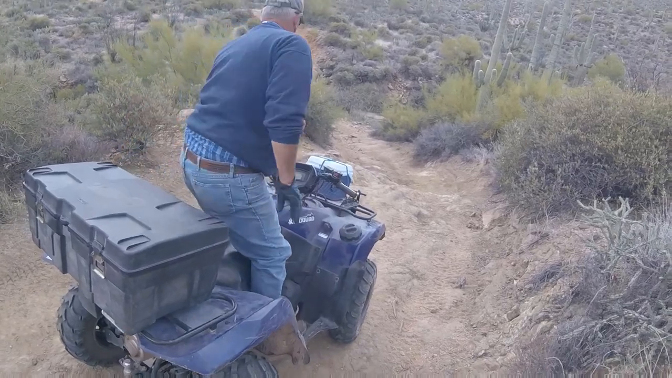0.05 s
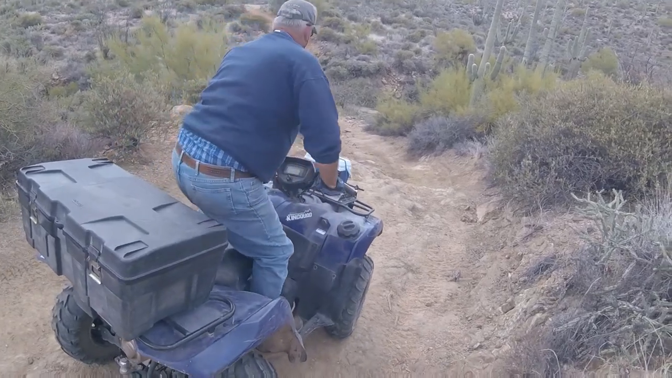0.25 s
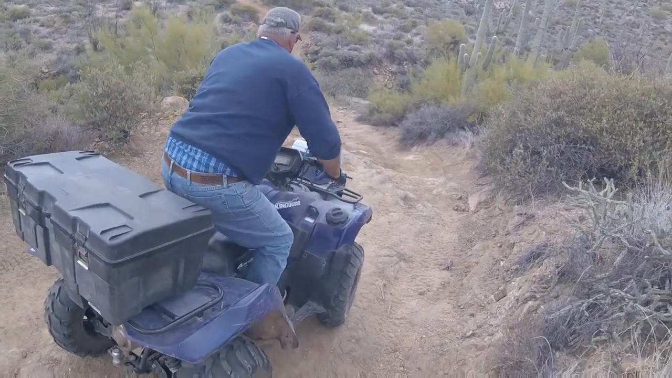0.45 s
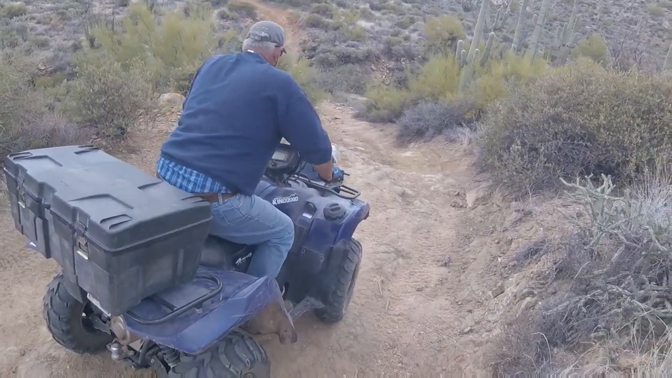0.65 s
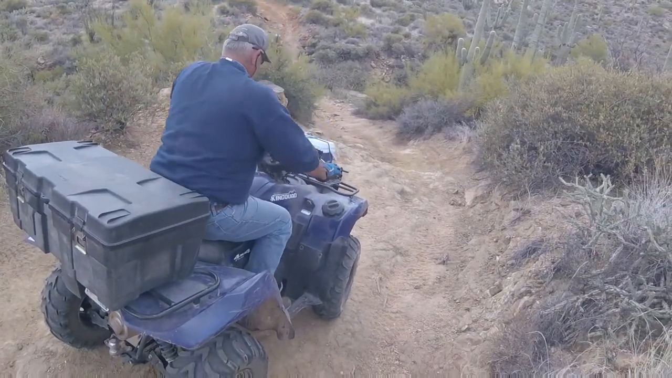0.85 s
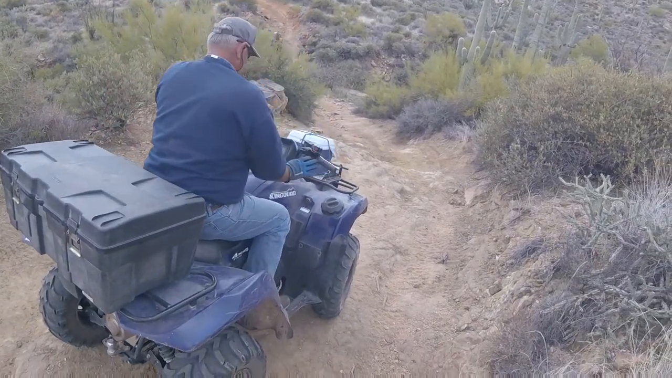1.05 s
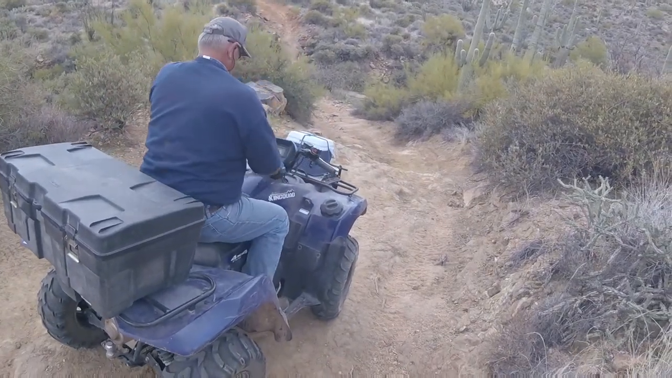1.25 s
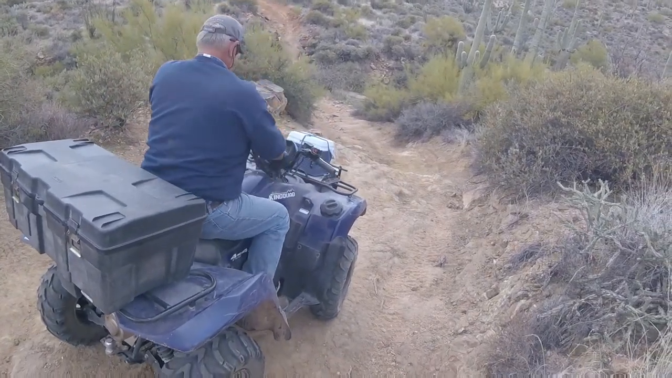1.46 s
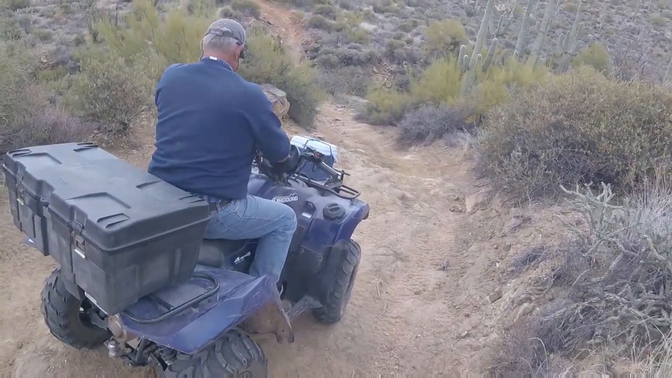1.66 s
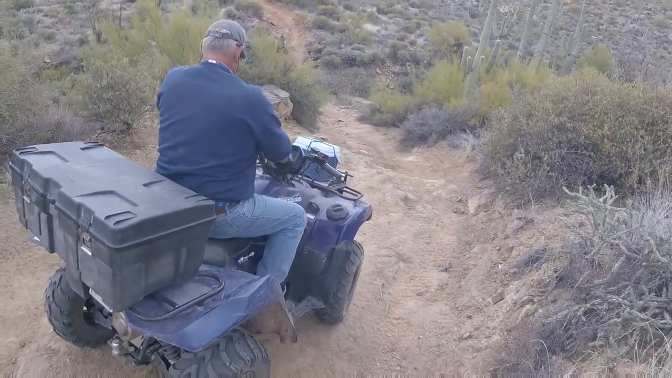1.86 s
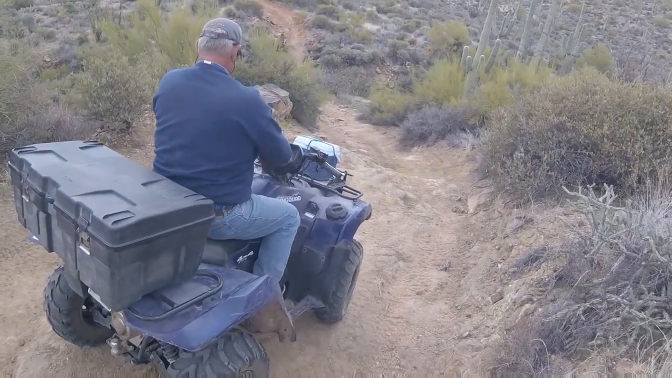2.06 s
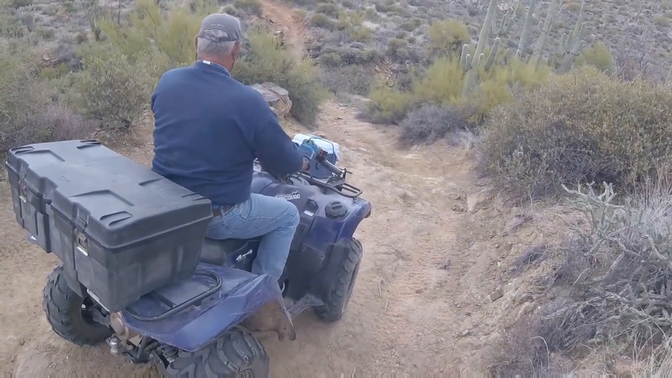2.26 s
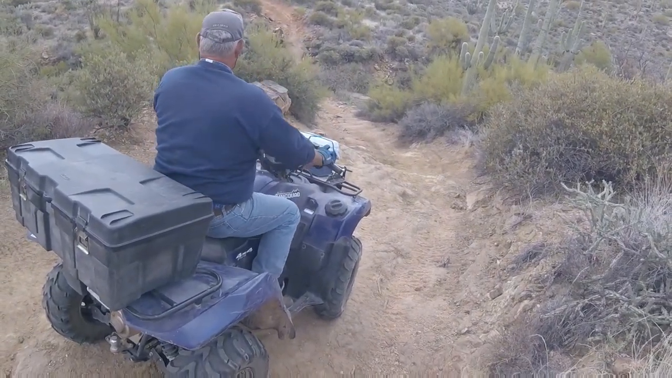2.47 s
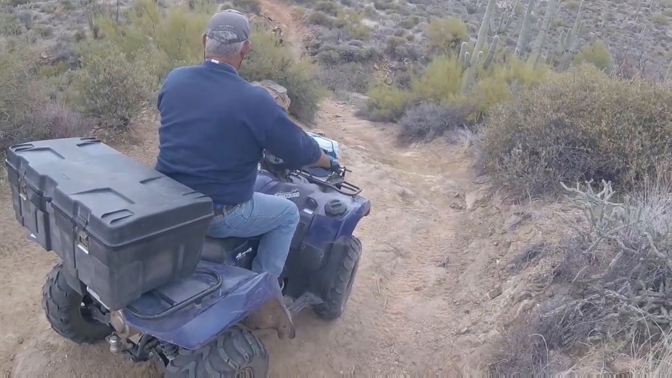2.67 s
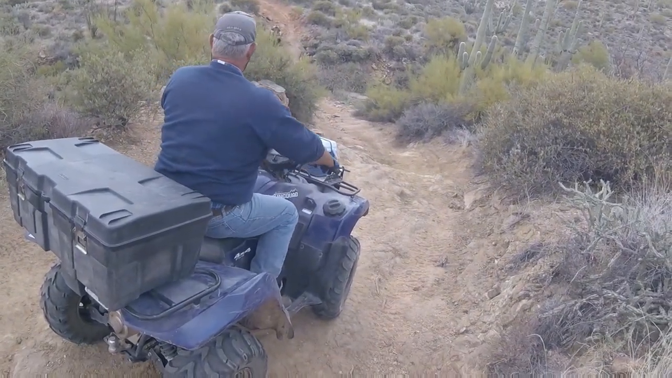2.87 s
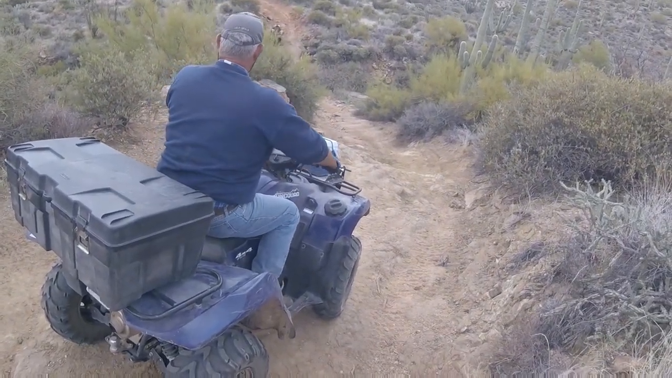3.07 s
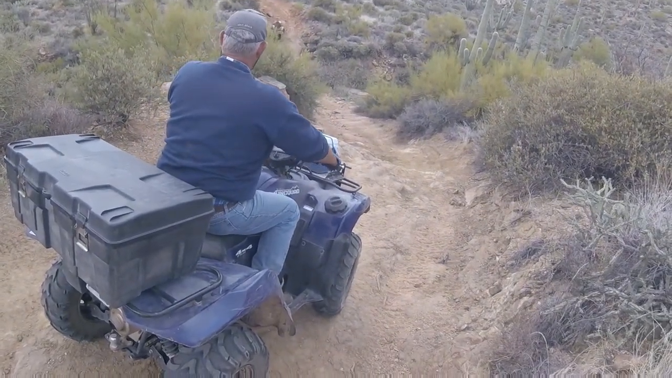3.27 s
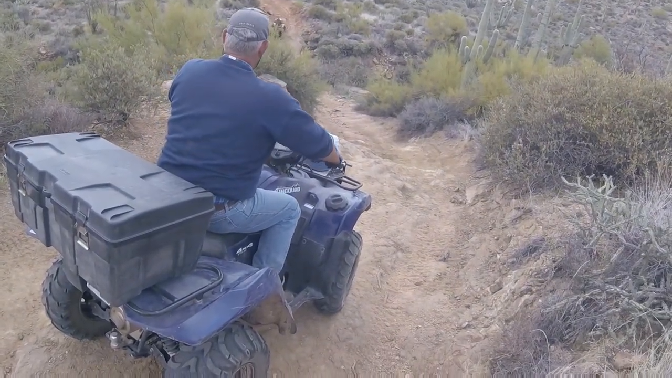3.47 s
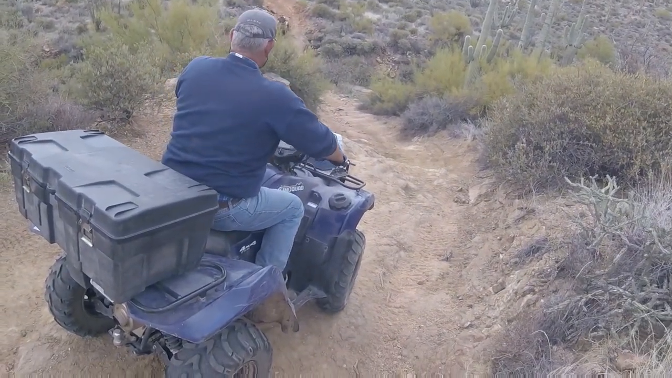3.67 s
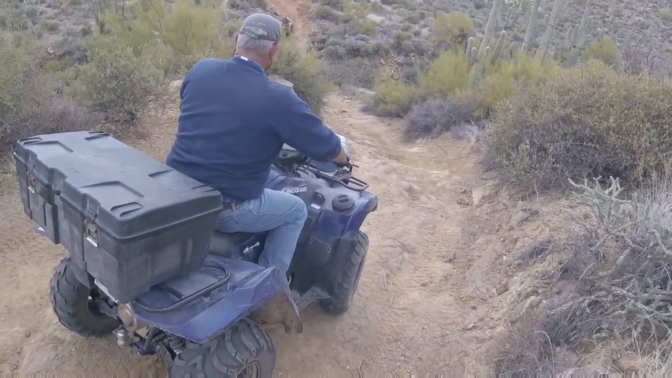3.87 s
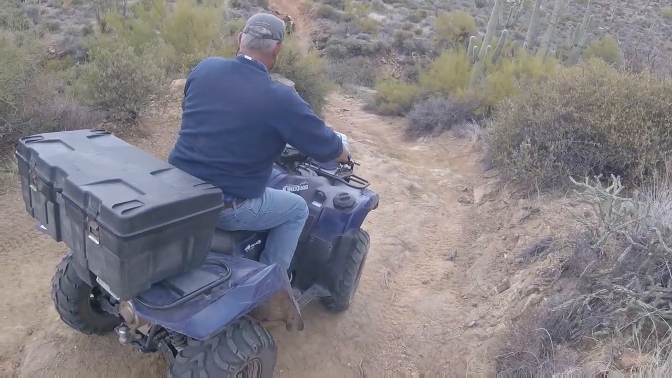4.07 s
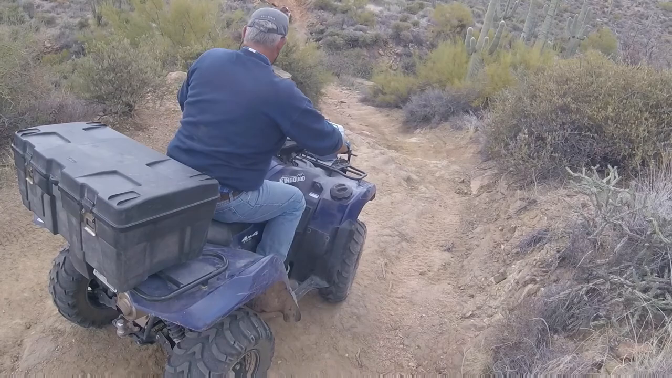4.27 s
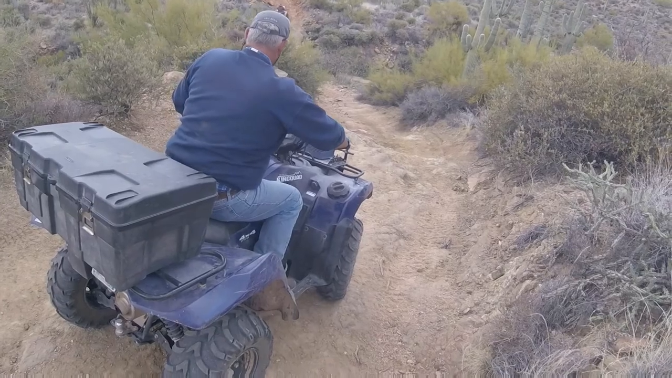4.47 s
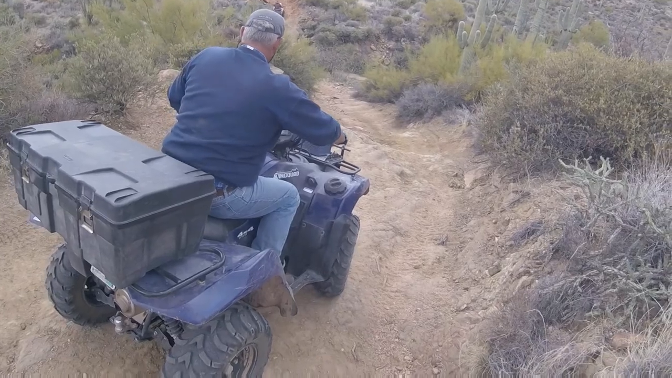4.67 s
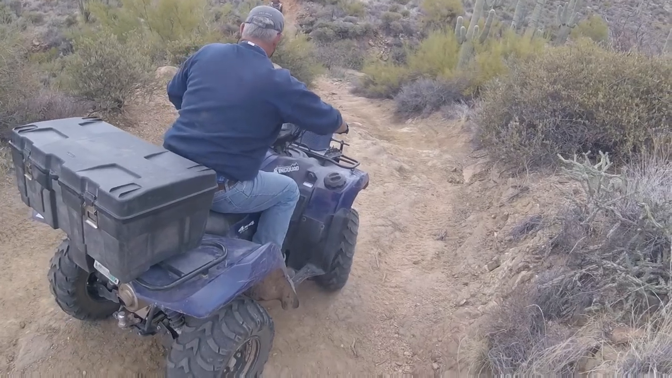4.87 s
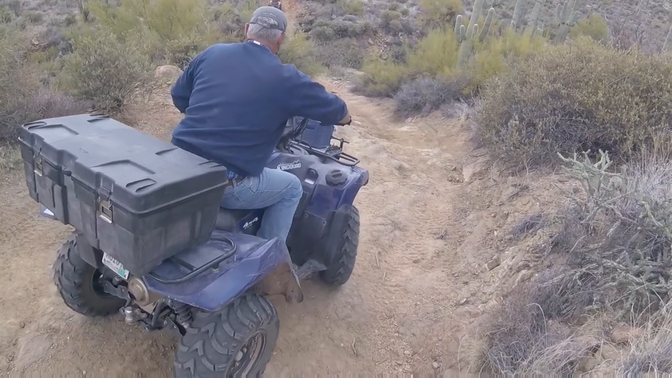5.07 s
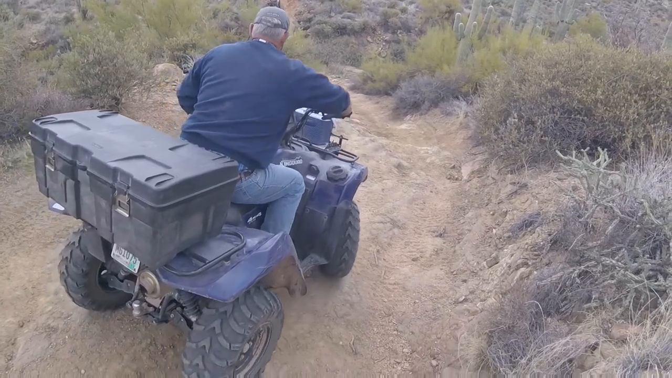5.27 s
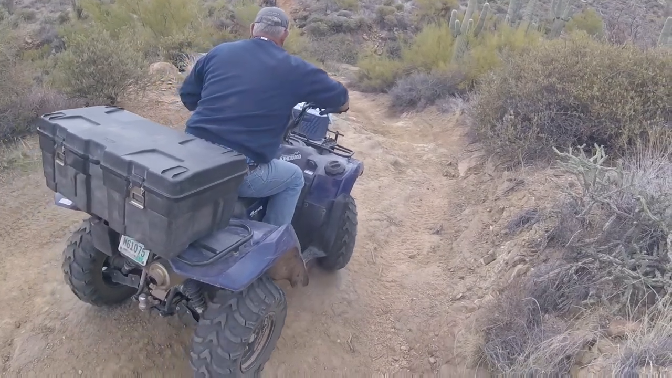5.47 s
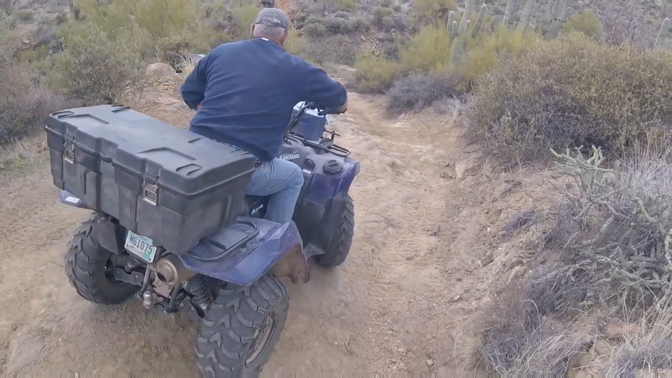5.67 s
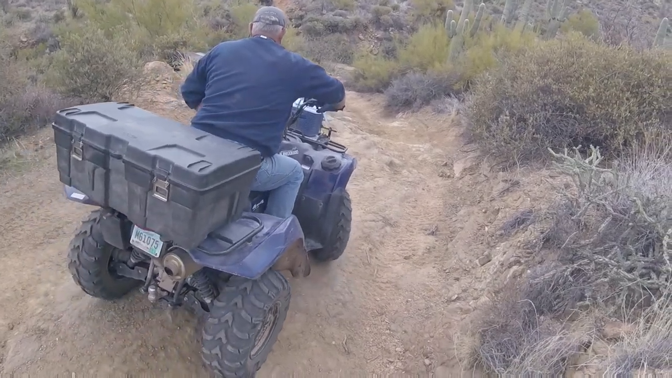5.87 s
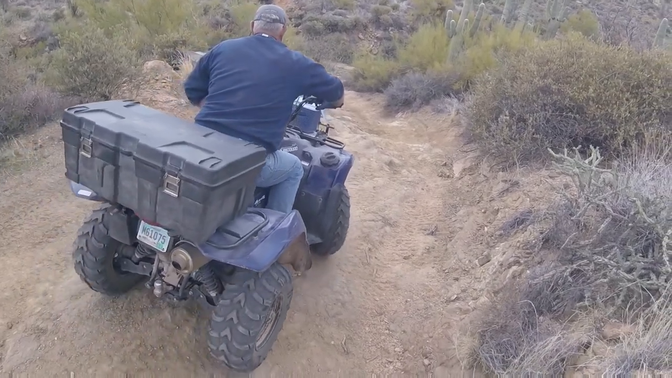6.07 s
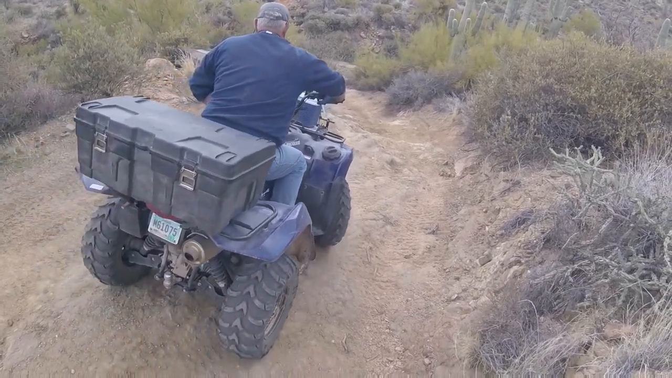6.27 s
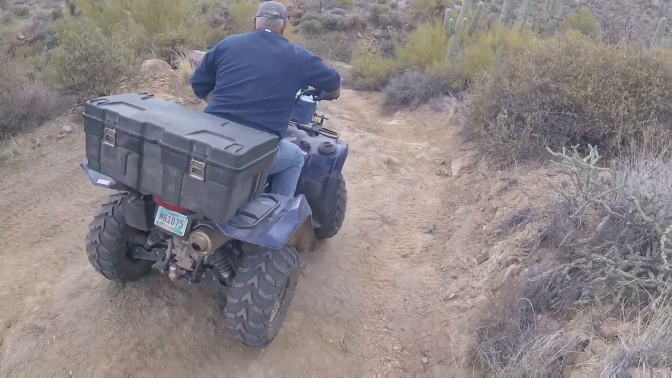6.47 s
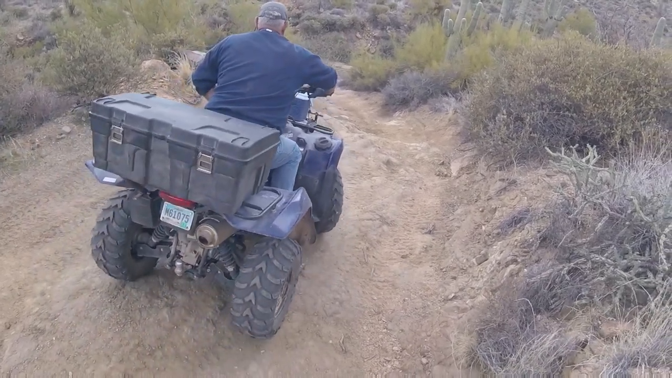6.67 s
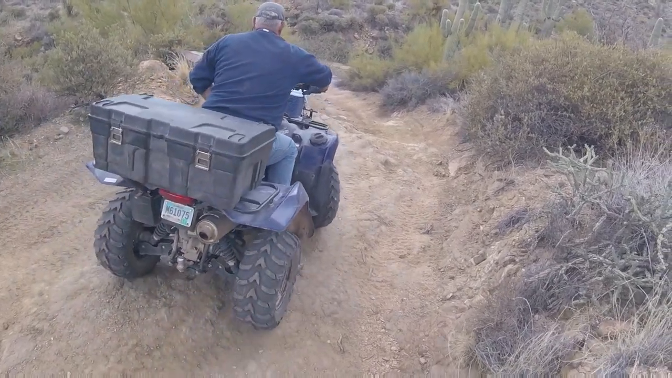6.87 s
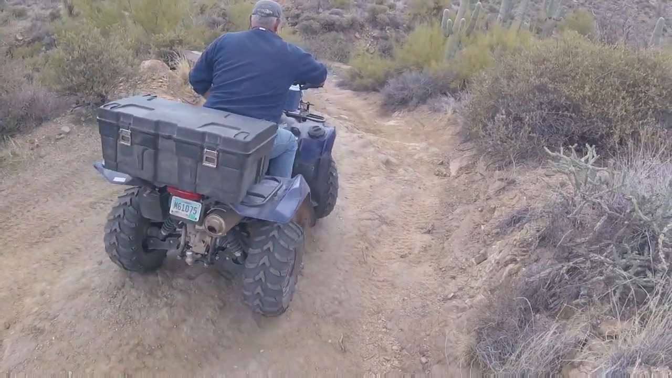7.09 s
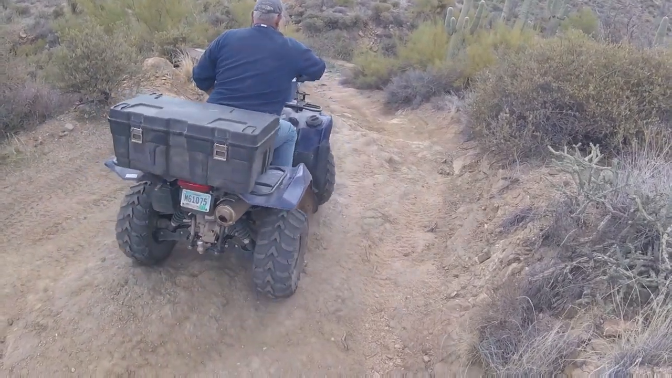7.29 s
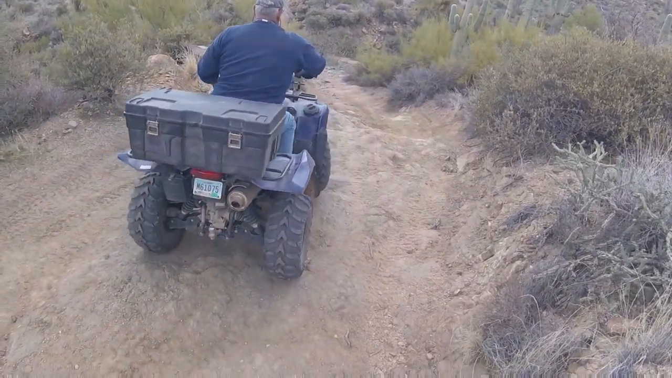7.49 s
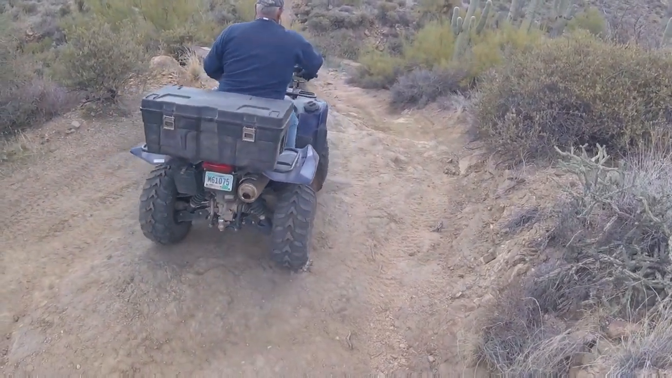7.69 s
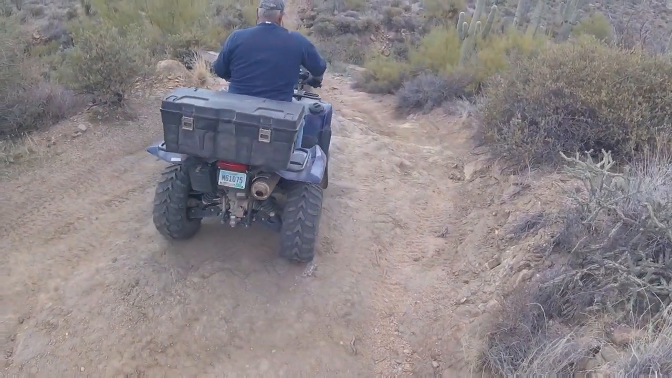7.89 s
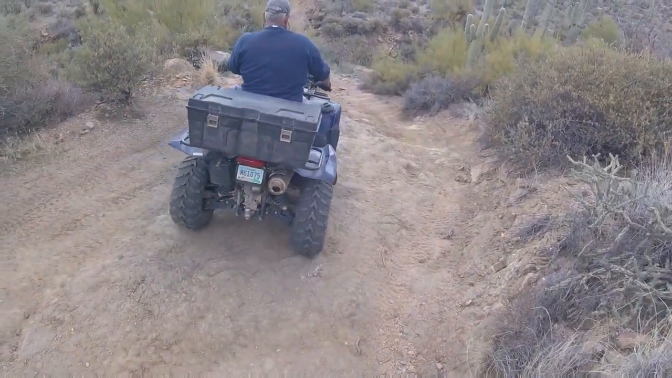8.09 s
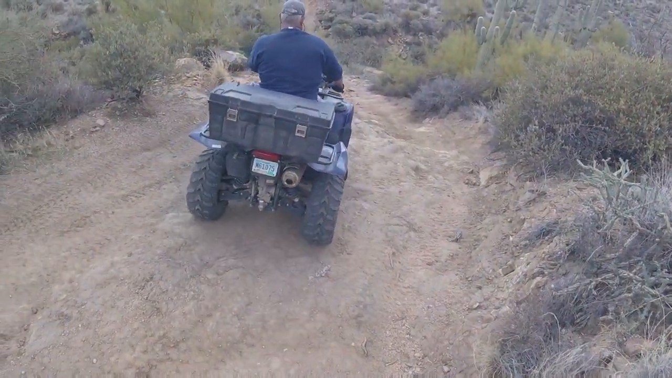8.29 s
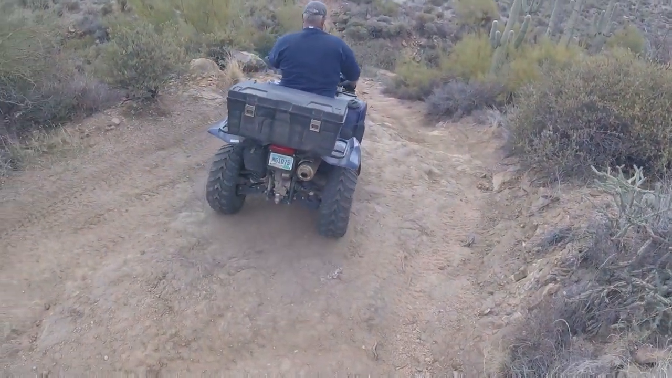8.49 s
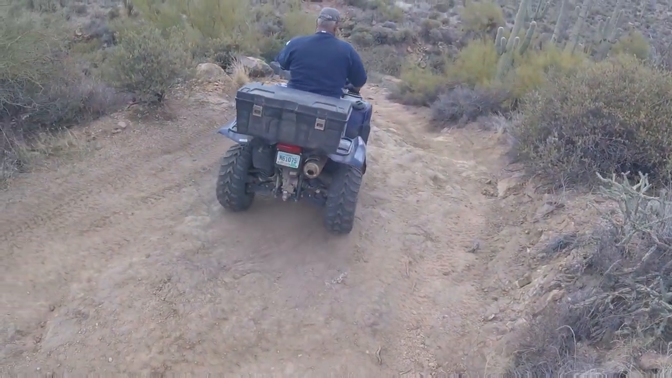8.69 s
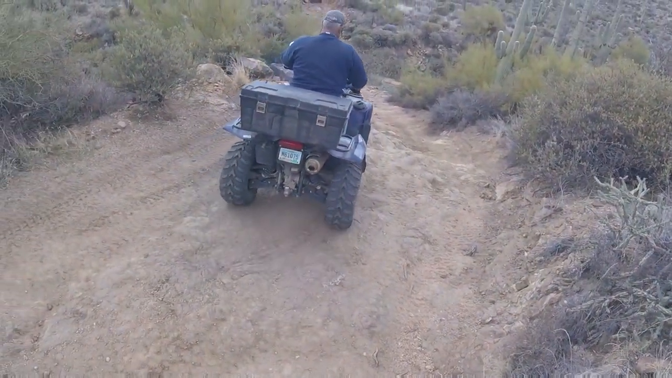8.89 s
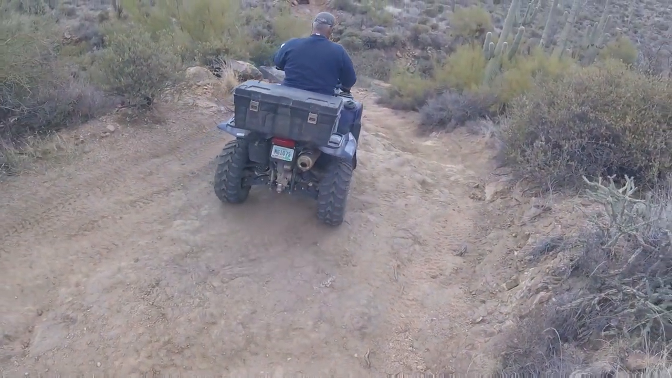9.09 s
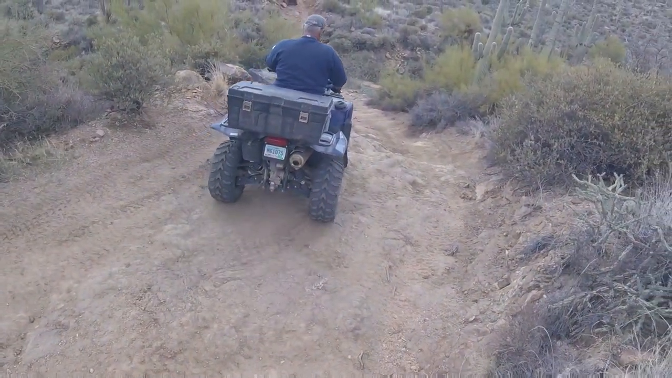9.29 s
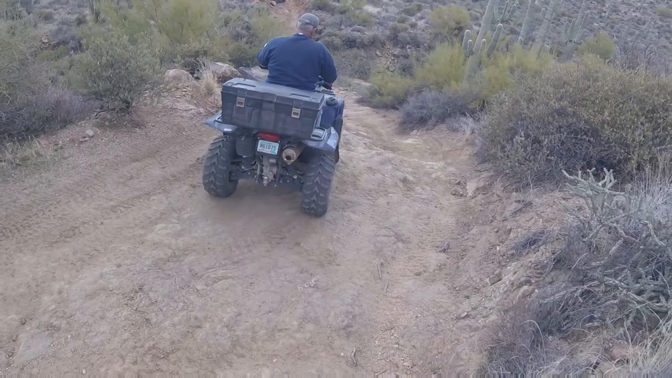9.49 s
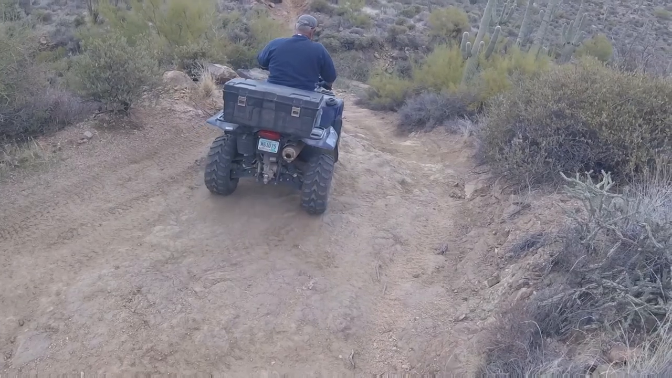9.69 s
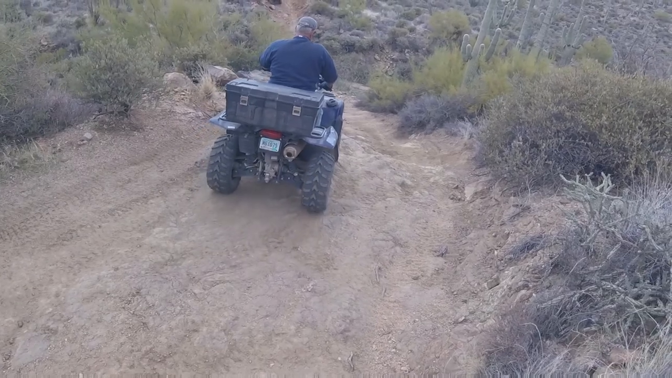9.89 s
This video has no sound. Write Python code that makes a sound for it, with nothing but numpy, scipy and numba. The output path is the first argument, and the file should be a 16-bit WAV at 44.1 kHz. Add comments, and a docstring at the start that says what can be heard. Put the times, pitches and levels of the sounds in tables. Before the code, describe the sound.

A nearby quad bike is started with a short, uneven grind after soft fuel pump ticking. The engine chugs and clatters, revs in a few surges with puffing exhaust and small chassis squeaks, then drops back to a low putter as it crawls away along the trail. Another quad idles dully in the background throughout, and gusts of wind bump the microphone in the open air.

```python
"""On a dirt trail a single-cylinder quad is started a few metres away and crawls off; another idles
further back. A fuel pump ticks and the starter gears grind. Each firing then rings the exhaust and
blows a puff of gas; valves tick, the cases clatter, timing gears sing, the chassis squeaks and clacks.
Wind buffets the microphone."""
import sys
import numpy as np
from scipy import signal
from scipy.io import wavfile
from scipy.ndimage import uniform_filter1d
from numba import njit

SR = 44100
rng = np.random.default_rng(int(sys.argv[2]) if len(sys.argv) > 2 else 0)


def store_pcm(level_fs):
    """Save levels as 16-bit WAV."""
    pcm = np.round(np.clip(level_fs, -1, 1) * 32767).astype(np.int16)
    wavfile.write(sys.argv[1], SR, np.atleast_2d(pcm).T)


N = 438354
TIME_S = np.arange(N) / SR
MESH_DB = -66  # timing gears at 2.4 m, throttle shut


def quad():
    """The near engine: one firing cycle drives all parts; throttle, heading and distance weight them."""
    # Each row: time in seconds, firings a second. Starts at the first firing.
    speed = [(3.1568, 11.595), (3.478, 10.119), (3.7667, 11.869), (4.5906, 12.554), (4.8617, 11.772),
             (5.3115, 13.803), (5.4956, 13.584), (5.9248, 16.214), (6.3031, 19.621), (6.638, 15.073),
             (6.9022, 19.217), (7.3762, 20.069), (7.4179, 14.336), (7.9007, 10.91), (9.2772, 10.965),
             (9.4465, 12.043), (9.4641, 10.333), (9.94, 11.374)]
    # Each row: time in seconds, throttle opening 0-1.
    opening = [(3.15, 0.87), (3.3, 0.24), (4.1, 0.39), (4.9, 0.38), (5.3, 0.59), (5.6, 0.82), (5.9, 0.78),
               (6.2, 0.93), (6.36, 0.89), (6.5, 0.42), (6.7, 0.79), (6.86, 0.91), (7.15, 0.78),
               (7.35, 0.65), (7.46, 0.31), (8.5, 0.31), (9.94, 0.07)]
    # Each row: time in seconds, distance in m, share heard from behind.
    path = [(3, 2.33, 0.083), (5.3, 2.25, 0.014), (6.5, 2.87, 0.03), (7.3, 2.95, 0.19), (8, 6.47, 0.36),
            (9.94, 8.4, 0.66)]
    # Per part: dB at 2.4 m with throttle shut, dB gained wide open, power of the opening,
    # dB gained from behind.
    parts = {"boom": (-36.5, 6.5, 1, 19.5), "bark": (-43, 11, 1.5, -7), "tail": (-64.5, 10.5, 2.5, 24),
             "gas": (-74.5, 26.5, 1.02, 31), "pop": (-60.5, 2.5, 5.5, -0.5), "clatter": (-53.5, 2, 2.5, 10),
             "valves": (-63, 3, 1, 3.5), "mesh": (MESH_DB, -2.8, 0.39, 2.4)}
    rate_hz, throttle = contour(speed), contour(opening)
    path_s, path_m, path_behind = np.transpose(path)
    distance_m, behind = curve(path_s, path_m), curve(path_s, path_behind)
    start_s = speed[0][0]
    cycles = np.cumsum(rate_hz * (TIME_S > start_s)) / SR + 1e-9 * TIME_S  # strictly rising
    count = np.arange(int(cycles[-1]) + 1)
    fire_s = np.maximum(np.interp(count, cycles, TIME_S), start_s)
    scatter = rng.standard_normal((len(count), 8)).T
    blow = low(clicks(fire_s - .0003, undb(scatter[0])), 131)
    flow = fade(blow, .017) * noise()  # turbulent outflow
    ticks = valve_ticks(cycles, scatter[2:6])
    exhaust = {"boom": pipe_boom(blow, rate_hz, behind),
               "bark": silencer_bark(blow, flow, rate_hz, throttle, behind),
               "tail": tailpipe(flow, fire_s, scatter[1], throttle, behind),
               "pop": chamber_pop(blow, flow, throttle),
               "gas": gas_puff(fire_s, scatter[1], throttle)}
    engine = {"valves": valve_cover(ticks),
              "clatter": via_ground(case_clatter(ticks, cycles, scatter[6:], behind), distance_m),
              "mesh": timing_gears(rate_hz, cycles)}
    gain = {name: undb(shut_db + open_db * throttle ** power + behind_db * behind) * 2.4 / distance_m
            for name, (shut_db, open_db, power, behind_db) in parts.items()}
    overrun = undb(12.5 * decay(start_s=7.428, decay_s=.25))  # the throttle snaps shut
    gain["gas"] *= overrun
    gain["boom"] *= overrun ** .2
    out = sum(gain[name] * level(x, 0) for name, x in exhaust.items())
    out /= np.sqrt(rate_hz / rate_hz.mean())  # levels per second, not per firing
    out += sum(gain[name] * level(x, 0) for name, x in engine.items())
    return out * (TIME_S > fire_s[0] - .002)


def pipe_boom(blow, rate_hz, behind):
    """A pressure thump leads the pipe tone, which hotter gas raises; shorter from behind."""
    hz = 46.95 + 2.47 * rate_hz
    out = level(band(blow, 62, 82), -10.5)
    for share, width_hz in ((1 - behind, 22.3), (behind, 41.6)):
        first = band(blow, hz, width_hz)
        out += share * level(.41 * first + band(first, hz, width_hz), 0)  # the same pipe tone once and twice over: quick onset, then a swell
    return out


def silencer_bark(blow, flow, rate_hz, throttle, behind):
    """The blow, its echo off the closed pipe end and the outflow ring the silencer."""
    # Each row: chamber pitch in Hz, width in Hz, gain in dB.
    silencer = [(179.5, 30, -16), (215.1, 56, 2), (247.5, 30, -6.5)]
    heat = 1 + .0071 * (rate_hz - rate_hz.mean())  # hotter gas raises the pitch
    chambers = [(hz * heat, width_hz, db) for hz, width_hz, db in silencer]
    echo = (.32 + .75 * (1 - throttle) + .81 * behind) * delay(blow, .01665 / heat)
    attack = level(ring(blow, chambers[1:2]), -17)
    rush = level(swell(flow, chambers), -20) * undb(13 * behind)
    return attack + level(swell(blow + echo, chambers), 0) + rush


def tailpipe(flow, fire_s, scatter, throttle, behind):
    """A hollow note, lower from behind, speaks after the blow; under load also at once."""
    outflow = level(flow, -4) + level(clicks(fire_s + .001, undb(2 * scatter)), 0)
    drive = 1.74 * throttle ** 1.8 * outflow + delay(outflow, .01057)
    return band_twice(drive, hz=637 - 102 * behind, width_hz=105)


def chamber_pop(blow, flow, throttle):
    """A small end chamber pops late, sooner under load."""
    drive = delay(blow, .01273 * (1 - throttle)) + level(flow, .5) * np.std(blow)
    return band_twice(drive, hz=378.5, width_hz=47)


def gas_puff(fire_s, scatter, throttle):
    """A noise burst leaves the outlet at each firing; under load it opens with a crack."""
    # Each row: resonance in Hz, width in Hz, gain in dB.
    outlet = [(820, 300, 10), (1430, 920, 7.5), (3120, 1700, -6), (4400, 2500, -22.5), (5180, 1220, 3.5),
              (5960, 1300, -6.5), (7700, 360, -25), (8600, 750, -29)]
    puff = fade(fade(clicks(fire_s + .004, undb(2 * scatter)), .013), .0003)
    crack = 10 * throttle ** 2 * fade(clicks(fire_s + .0029, undb(1.5 * scatter)), .0028)
    return ring((puff + crack) * noise(), outlet)


def valve_ticks(cycles, scatter):
    """Envelope of four valve impacts a cycle."""
    # Each row: share of the cycle, level in dB, decay in seconds.
    impacts = [(.03, 0, .01), (.2, 0, .01), (.7, -10, .005), (.86, -6, .006)]
    return sum(fade(cycle_clicks(cycles, share, db + 2 * spread), decay_s)
               for (share, db, decay_s), spread in zip(impacts, scatter))


def valve_cover(ticks):
    """Noise gated by the ticks rings the cover."""
    # Each row: resonance in Hz, width in Hz, gain in dB.
    modes = [(5000, 910, -10), (5850, 1400, -2), (6420, 400, -0.5), (8920, 2800, -8)]
    return swell(ticks * noise(), modes)


def case_clatter(ticks, cycles, scatter, behind):
    """Valves and piston slap rattle the cases; jolts add to it as the drive takes up."""
    # Each row of both: resonance in Hz, width in Hz, gain in dB.
    side_modes = [(505, 400, 14), (832, 30, 12), (1130, 140, 4.5), (1448, 39, 11), (1660, 230, 2),
                  (2086, 17, 8.5), (2360, 610, -2.5), (2705, 66, 1), (3270, 190, -18)]
    rear_modes = [(998, 520, 13.5), (1333, 230, 16), (1520, 340, 10.5), (1820, 160, -5), (2534, 530, 5)]
    # Each row: share of the cycle, slap level in dB.
    piston = [(.36, -1.5), (.86, -2.5)]
    # Each row: start in seconds, length in seconds, added rattle in dB.
    jolts = [(4.351, 0.02, -5), (4.442, 0.031, -15.5), (4.522, 0.056, -7), (4.588, 0.075, 1.5)]
    knocks = undb(2 * walk(40)) * noise()
    slaps = sum(cycle_clicks(cycles, share, db + 1.6 * spread)
                for (share, db), spread in zip(piston, scatter))
    slaps = level(fade(fade(slaps, .0081), .0014), 0)
    rattle = .5 + uniform_filter1d(ticks, size=600) + .2 * slaps
    side = level(ring(rattle * knocks, side_modes), 0)
    rear = level(swell((1.1 + slaps) * knocks, rear_modes), 0)
    jolt = 1 + sum(undb(db) * triangle(s, .0036, length_s) for s, length_s, db in jolts)
    return np.sqrt(1 - behind) * side * jolt + np.sqrt(behind) * rear


def via_ground(x, distance_m):
    """The sound arrives again off the dirt; the lag shrinks with distance."""
    engine_m, mic_m = .512, 1.37  # heights
    detour_m = np.hypot(distance_m, mic_m + engine_m) - np.hypot(distance_m, mic_m - engine_m)
    return x + .054 * delay(x, detour_m / 343)


def timing_gears(rate_hz, cycles):
    """The crank surges after each firing: one arched gear chirp a cycle, fading above idle."""
    # Each row: time in seconds, gain in dB.
    song = [(4.4, -9), (4.55, -3), (4.65, 2), (5, 1), (5.2, -2), (8.1, 1), (8.5, 3), (8.8, -2), (9, 1),
            (9.4, 0)]
    teeth_per_cycle, idle_hz = 170, 12.3
    surge = np.cos(2 * np.pi * (cycles - .17))
    hz = teeth_per_cycle * rate_hz * (1 + .04 * (surge - 1) + .00548 * walk(30))
    db = 1.5 * walk(6) + contour(song) - 12 * np.maximum(rate_hz - idle_hz, 0)
    chirp = np.exp(2.5 * np.cos(2 * np.pi * (cycles - .25)))
    return chirp * undb(db) * sine(hz)


def starter():
    """Uneven tooth knocks ring the gear case, hardest on each compression; slipping teeth rasp."""
    # Each row: resonance in Hz, width in Hz, gain in dB. Six for the case, then the teeth.
    modes = [(780, 220, 14), (1080, 190, 7), (1459, 21, 19), (1730, 310, 9), (2450, 1350, 6.5),
             (3370, 26, 11), (4060, 210, 2), (4800, 670, -1.5), (5600, 200, 3.5), (5910, 85, 5),
             (6200, 190, -8)]
    # Each row: start, rise and length in seconds, level in dB, relative treble in dB.
    grinds = [(2.603, .001, 0.0091, -54.5, 6), (2.608, 0.055, 0.1, -45, -2),
              (2.691, .005, 0.091, -51.5, -0.5), (2.759, .004, 0.027, -51, -3),
              (2.762, 0.039, 0.084, -41.5, 0.5), (2.826, 0.012, 0.096, -52, -6),
              (2.99, 0.0024, 0.031, -41.5, -1.5), (3.013, 0.0056, 0.032, -45.5, 0),
              (3.093, 0.0067, 0.065, -41.5, 2)]
    # Each row: start and length in seconds, first and last pitch in Hz, level in dB.
    rasps = [(2.635, .075, 3450, 3400, -54), (2.64, .05, 2600, 2550, -54), (2.755, .055, 5400, 5700, -45),
             (2.78, .04, 6700, 6000, -47), (2.8, .035, 4600, 3800, -45), (2.81, .045, 1850, 1900, -45),
             (2.81, .045, 2750, 2800, -48), (3.092, .05, 6400, 5700, -41), (2.988, .025, 5900, 5800, -44),
             (3.092, .05, 1450, 1430, -43), (3.108, .035, 2650, 2400, -43)]
    knocks = noise() * undb(2.9 * np.minimum(rng.exponential(size=N), 5)) * undb(3.4 * walk(150))
    case = level(ring(band(knocks, 1350, 4200), modes[:6]), 0)
    teeth = level(ring(knocks, modes[6:]), 0)
    out = undb(-58.5) * (TIME_S > 2.6) * (TIME_S < 3.7) * case  # whirr between compressions
    for s, rise_s, length_s, db, treble_db in grinds:
        shape = curve([s, s + rise_s, s + .7 * length_s + .3 * rise_s, s + length_s], [0, 1, .55, 0])
        out += undb(db) * shape * (case + undb(treble_db) * teeth)
    out += glides(knocks, rasps, width_hz=200, rise_share=.44)
    released_gear = undb(-62) * decay(start_s=3.03, decay_s=.03) * np.sin(2 * np.pi * 5950 * TIME_S)
    return out + released_gear + starter_whine()


def starter_whine():
    """Gear whine sinks as compression slows the starter."""
    # Each row: start and length in seconds, first and last pitch in Hz, level in dB.
    whines = [(2.655, .05, 990, 960, -54), (2.782, .055, 1380, 930, -38), (3.1, .045, 1520, 1150, -39)]
    # Each row: harmonic number, gain in dB.
    orders = [(1, -2), (2, 0), (3, -14), (4, -12)]
    out = np.zeros(N)
    for s, length_s, from_hz, to_hz, db in whines:
        hz = curve([s, s + length_s], [from_hz, to_hz])
        whine = sum(undb(order_db + 6 * walk(90)) * sine(k * hz * (1 + .035 * walk(300)))
                    for k, order_db in orders)
        out += undb(db) * whine * triangle(s, .34 * length_s, length_s)
    return out


def chassis_squeaks():
    """The moving chassis rubs in short thin squeaks."""
    # Each row: start and length in seconds, first and last pitch in Hz, level in dB.
    squeaks = [(3.783, 0.11, 3440, 3200, -56.5), (6.012, 0.04, 7040, 7400, -48),
               (6.802, 0.11, 7200, 7500, -52), (7.19, 0.09, 7500, 7200, -57)]
    rub = noise() * undb(6.8 * walk(120))
    return glides(rub, squeaks, width_hz=220, rise_share=.5)


def loose_parts():
    """Loose metal clacks as the chassis jolts."""
    # Each row: time in seconds, peak level in dB, pitch in Hz.
    clacks = [(6.1614, -45, 5050), (6.319, -50, 5690), (7.213, -38.5, 4830)]
    hiss = noise()
    return sum(decay(s, .0058) * level(band(hiss, hz, 900), db) for s, db, hz in clacks)


def far_quad():
    """Steady idle firings ring a pipe, dull with distance, over two faint tones."""
    # Each row: resonance in Hz, width in Hz, gain in dB.
    pipe = [(52, 26, 2.5), (100.7, 22, 8), (135.8, 24.4, -11), (255.7, 59, -8.5)]
    # Each row: pitch in Hz, level in dB.
    tones = [(711, -77), (926, -79)]
    # Each row: time in seconds, gain in dB.
    loudness = [(2.6, 5.5), (5, 0.5), (9.94, 2)]
    firings, rate_hz = 105, 10.49
    jitter, scatter = rng.standard_normal((firings, 2)).T
    fire_s = .037 + np.arange(firings) / rate_hz + .002 * jitter
    blow = low(clicks(fire_s, undb(2.2 * scatter)), 190)
    hum = sum(level(band(noise(), hz, 17), db) for hz, db in tones)
    flow = fade(np.abs(blow), .18) * noise()
    exhaust = level(swell(blow, pipe), -44.5) + level(swell(flow, pipe), -53.5)
    return undb(contour(loudness)) * (exhaust + hum)


def fuel_pump():
    """Soft uneven ticks over a whirr."""
    # Each row: time in seconds, gain in dB.
    loudness = [(1.3, -85), (1.6, -77), (1.9, -76), (2.05, -81), (2.3, -88)]
    count, rate_hz, whirr = 28, 25.9, 1.6
    jitter, scatter = rng.standard_normal((count, 2)).T
    tick_s = 1.31 + np.arange(count) / rate_hz + .004 * jitter
    ticks = fade(fade(clicks(tick_s, undb(1.5 * scatter)), .008), .002)
    treble = level(band((level(ticks, 0) + whirr) * noise(), 4860, 1500), 0)
    body = level(band(noise(), 580, 450), 13)
    return undb(contour(loudness)) * (treble + body)


def wind():
    """Turbulence on the microphone: a deep unsteady rumble and short buffets."""
    # Each row: time in seconds, rumble level in dB.
    strength = [(0, -38), (.55, -36.5), (1.2, -36), (2, -34), (2.4, -40), (3, -34), (4, -35), (4.6, -32.5),
                (5.4, -36), (6.2, -38), (7.3, -37.5), (7.6, -34), (9, -37.5), (9.5, -42.5), (9.94, -39.5)]
    # Each row: start and length in seconds, level in dB, cutoff in Hz.
    buffets = [(2.522, 0.075, -24.5, 100), (2.598, 0.07, -37, 126), (7.39, 0.097, -31, 88),
               (8.451, 0.22, -28.5, 146), (8.544, 0.034, -31.5, 280), (8.649, 0.035, -33, 298),
               (8.694, 0.053, -27, 266), (9.198, 0.047, -28, 292), (9.246, 0.055, -27.5, 195),
               (9.329, 0.08, -28, 177)]
    out = level(low(low(noise(), 92.3), 121), 0) * undb(contour(strength) + 2 * walk(7))
    eddies = band(noise(), 50, 82) * undb(4 * walk(35))
    for s, length_s, db, hz in buffets:
        shape = curve(s + length_s * np.array([0, .34, .96, 1]), [0, 1, 1, 0])
        out += level(low(low(eddies, hz), 1.18 * hz), db) * shape
    return out


def air():
    """Far engine clatter and breeze: quarter-octave noise bands that flicker independently."""
    # Each row: frequency in Hz, relative power per Hz in dB.
    spectrum = [(300, -2.5), (420, -8.5), (600, -5), (780, -20.5), (930, -9.5), (1300, -15), (1900, -15.5),
                (2600, -21), (3600, -28.5), (5000, -25.5), (6500, -21), (8000, -24), (11000, -22),
                (14000, -13)]
    knots_hz, density_db = np.transpose(spectrum)
    out = np.zeros(N)
    for hz in 330 * 2 ** np.arange(0, 5.4, 1 / 4):
        db = np.interp(np.log(hz), np.log(knots_hz), density_db) + 10 * np.log10(hz)
        out += undb(db + 3.2 * walk(13)) * level(band_twice(noise(), hz, hz / 4), 0)
    return level(out, -59.5)


def undb(db):
    return 10 ** (np.asarray(db) / 20)


def level(x, db):
    """Set the rms level."""
    return x * undb(db) / np.sqrt(np.mean(x ** 2))


def noise():
    return rng.standard_normal(N)


def sine(hz):
    return np.sin(2 * np.pi * np.cumsum(hz) / SR)


def curve(s, values):
    return np.interp(TIME_S, s, values)


def contour(rows):
    return curve(*np.transpose(rows))


def triangle(start_s, rise_s, length_s):
    return curve([start_s, start_s + rise_s, start_s + length_s], [0, 1, 0])


def decay(start_s, decay_s):
    return (TIME_S > start_s) * np.exp(-np.abs(TIME_S - start_s) / decay_s)


def delay(x, delay_s):
    return np.interp(TIME_S - delay_s, TIME_S, x)


def walk(rate_hz):
    """Random steps, smoothed twice; spread about 0.4."""
    hold = int(SR / rate_hz)
    steps = np.repeat(rng.standard_normal(N // hold + 1), hold)
    return .58 * uniform_filter1d(uniform_filter1d(steps, hold), hold)[:N]


def clicks(s, size):
    """Single-sample pulses at given times."""
    out = np.zeros(N)
    at = np.round(s * SR).astype(int)
    out[at[at < N]] = size[at < N]
    return out


def cycle_clicks(cycles, share, db):
    """One click at the same point of each engine cycle."""
    return clicks(np.interp(np.arange(len(db)) + share, cycles, TIME_S, right=99), undb(db))


def fade(x, decay_s):
    """Give every click an exponential tail."""
    return signal.lfilter([1], [1, -np.exp(-1 / (decay_s * SR))], x)


def low(x, hz):
    return signal.sosfilt(signal.butter(2, hz, fs=SR, output="sos"), x)


@njit
def svf(x, hz, width_hz):
    """State-variable band-pass, gain 1 at a centre that may move."""
    out, band_state, low_state = np.empty(len(x)), 0., 0.
    for i in range(len(x)):
        g, damping = np.tan(np.pi * hz[i] / SR), width_hz / hz[i]
        v = (band_state + g * (x[i] - low_state)) / (1 + g * (g + damping))
        band_state, low_state = 2 * v - band_state, low_state + 2 * g * v
        out[i] = damping * v
    return out


def band(x, hz, width_hz):
    return svf(x + 1e-18, hz * np.ones(N), float(width_hz))


def band_twice(x, hz, width_hz):
    return band(band(x, hz, width_hz), hz, width_hz)


def ring(x, modes):
    """Parallel resonances."""
    return sum(undb(db) * band(x, hz, width_hz) for hz, width_hz, db in modes)


def swell(x, modes):
    """Each resonance twice over: soft start, deep valleys."""
    return sum(undb(db) * band_twice(x, hz, width_hz) for hz, width_hz, db in modes)


def glides(x, events, width_hz, rise_share):
    """Short bursts of x through a gliding resonance."""
    out = np.zeros(N)
    for s, length_s, from_hz, to_hz, db in events:
        hz = curve([s, s + length_s], [from_hz, to_hz])
        out += level(band_twice(x, hz, width_hz), db) * triangle(s, rise_share * length_s, length_s)
    return out


def scene():
    """All sources at one microphone."""
    near = quad() + starter() + chassis_squeaks() + loose_parts()
    return (near + far_quad() + fuel_pump() + wind() + air())[None]


def record(dry):
    """Deep bass and treble are softened, loud peaks are rounded, nothing sounds above about 14 kHz."""
    thinned = signal.sosfilt(signal.butter(2, 20, "high", fs=SR, output="sos"), dry)
    dulled = low(low(thinned, 6700), 8240)
    rounded = np.tanh(4.155 * dulled) / 4.51
    return signal.sosfilt(signal.ellip(8, .2, 70, 14300, fs=SR, output="sos"), rounded)


dry = scene()
out = record(dry)
store_pcm(out)
```